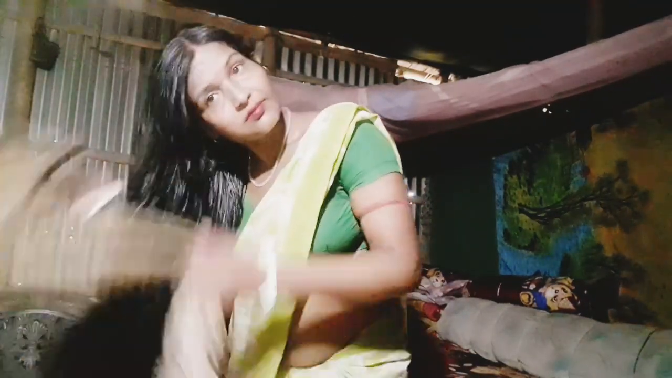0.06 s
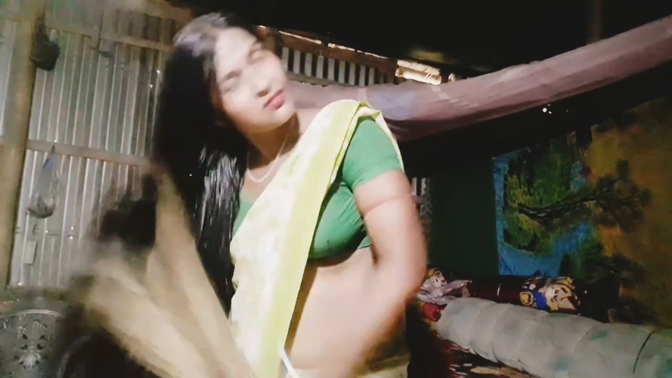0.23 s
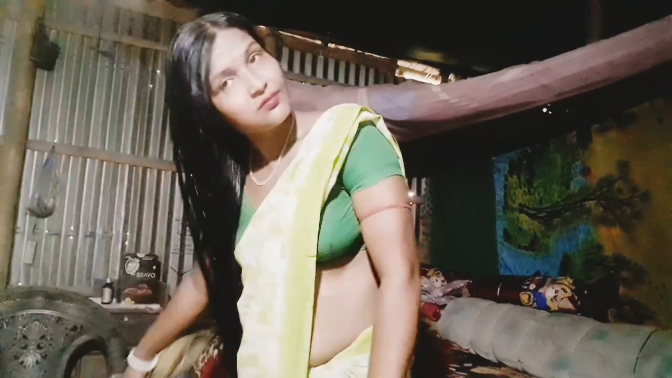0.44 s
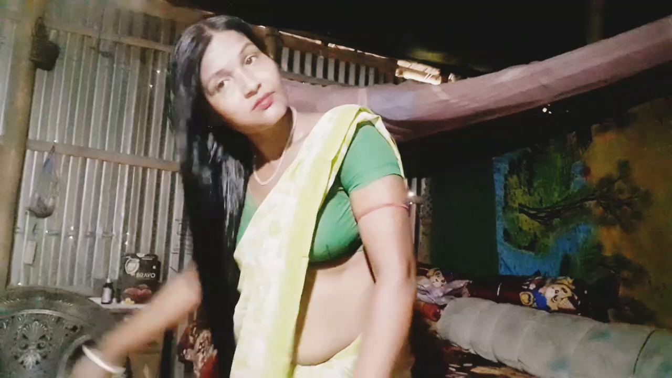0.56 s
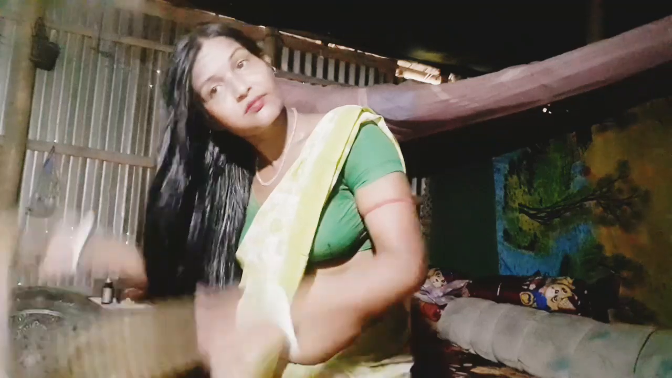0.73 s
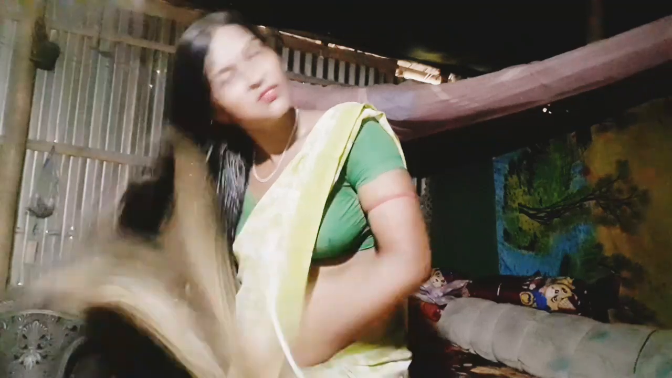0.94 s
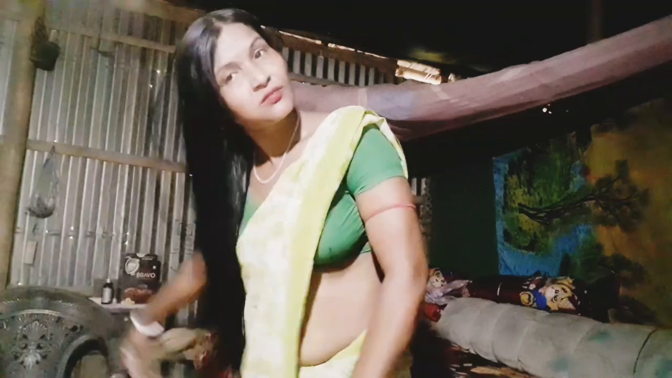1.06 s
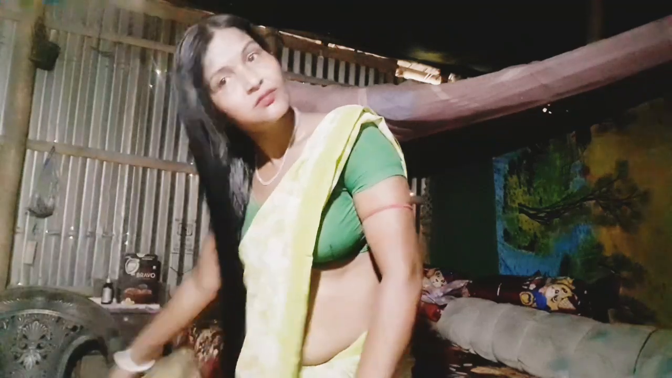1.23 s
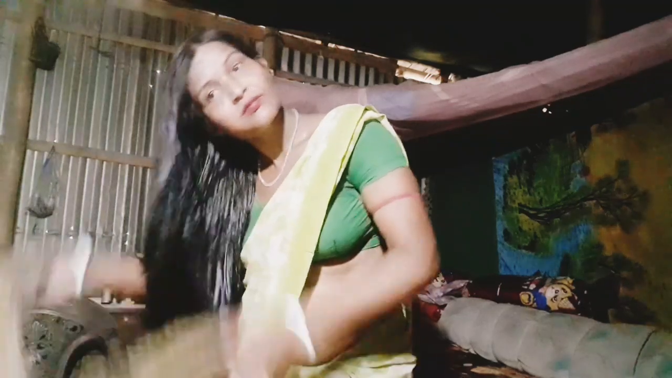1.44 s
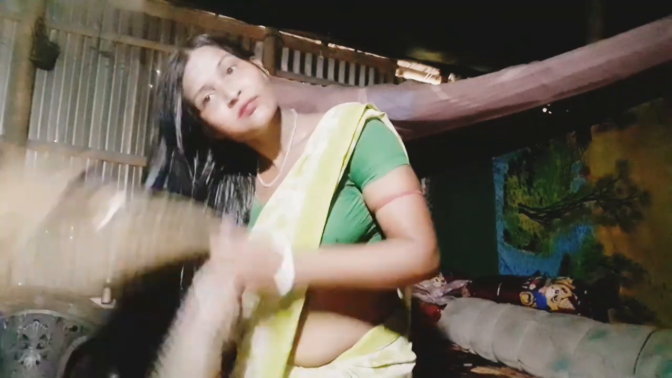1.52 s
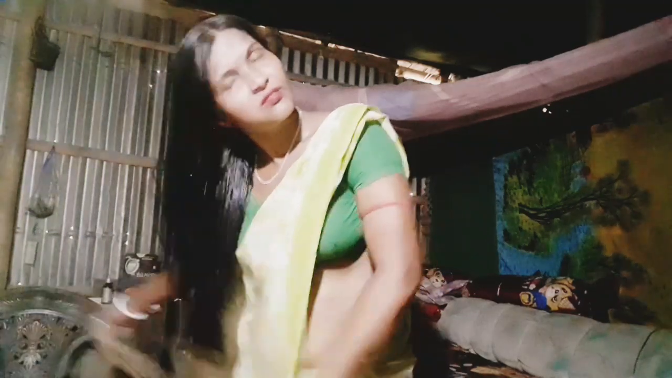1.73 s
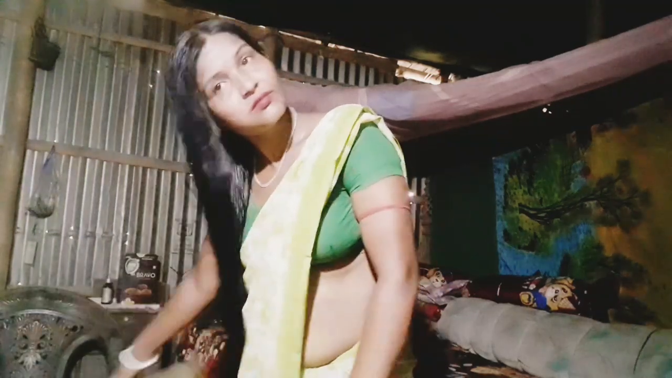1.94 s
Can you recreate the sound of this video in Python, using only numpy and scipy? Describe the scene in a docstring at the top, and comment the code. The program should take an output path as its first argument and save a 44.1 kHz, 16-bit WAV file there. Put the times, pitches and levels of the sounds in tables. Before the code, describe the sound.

Wet hair whipped with a cloth three times, crisp hissing swishes in a small humming room

```python
"""Wet hair swishes three times as a cloth is slapped through it in a small room: filtered noise, part hiss, part
spatters, in three bands. Short noise bursts make cracks; clicks, puffs, thumps and damped rings the dull landing.
A faint rustle and bump lift the cloth. Random taps make the room. Underneath: shaped noise for the room,
noise resonances and a narrow band traced point by point near 200 Hz for a fan-like hum, and an insect outside,
a pulsed resonance above 10 kHz."""
import sys
import numpy as np
from scipy import signal
from scipy.io import wavfile
from scipy.ndimage import uniform_filter1d

SR = 44100
rng = np.random.default_rng(int(sys.argv[2]) if len(sys.argv) > 2 else 0)


def dump_mix(stems):
    """Bounce the given channels to the path in sys.argv[1] as a 16-bit WAV at rate SR."""
    frames = np.atleast_2d(stems).T  # one column per channel
    limited = np.clip(frames, -1, 1)  # hard clip at full scale
    pcm = np.round(limited * 32767).astype(np.int16)
    wavfile.write(sys.argv[1], SR, pcm)


def how_loud(loudness_db):
    """Turn decibels into a plain amplitude multiplier (0 dB gives 1, 20 dB gives 10)."""
    steps = np.asarray(loudness_db, float) / 20
    return 10 ** steps


N = 88200

# spectrum of wet strands, swishing or snapping: f/Hz, relative level/dB
STRAND_SPECTRUM = [(60, -41), (100, -5), (350, -5), (800, -4), (1300, -5.5), (1900, -12.5), (2800, -8),
                   (4000, -4), (6500, -3), (7300, -7.5), (8000, -16), (9000, -17), (10200, -7.5),
                   (12300, -2), (15800, 0.5)]
BODY_HZ, TREBLE_HZ = 1900, 9000  # band limits of the strands


def evened(x):
    """Scales to an rms of 1."""
    return x / np.sqrt(np.mean(x ** 2) + 1e-20)


def read(points, hz):
    """Interpolates a table of (f/Hz, value) along log frequency."""
    f, value = np.transpose(points)
    return np.interp(np.log(hz + 1), np.log(f + 1), value)


def add(mix, start_s, sound):
    """Adds a sound in place, cut off at the ends of the mix."""
    at = round(start_s * SR)
    sound = sound[max(-at, 0):]
    part = mix[max(at, 0):][:len(sound)]
    part += sound[:len(part)]


def colour(x, points):
    """Minimum-phase filter of unit energy with the given spectrum shape."""
    gain_db = np.maximum(read(points, np.abs(np.fft.fftfreq(4096, 1 / SR))), -70)
    log_gain = np.log(how_loud(gain_db))
    phase = -signal.hilbert(log_gain).imag
    taps = np.fft.ifft(np.exp(log_gain + 1j * phase)).real[:2048]
    return signal.oaconvolve(x, taps / np.linalg.norm(taps))[:len(x)]


def band(x, lo_hz, hi_hz):
    """Butterworth band-pass."""
    return signal.sosfilt(signal.butter(3, [lo_hz, hi_hz], "band", fs=SR, output="sos"), x)


def resonate(x, hz, width_hz):
    """One-pole resonance of gain 1 that follows the curve hz: shift to 0 Hz, smooth, shift back."""
    turn = np.exp(2j * np.pi * np.cumsum(hz * np.ones(len(x))) / SR)
    r = np.exp(-np.pi * width_hz / SR)
    return 2 * (turn * signal.lfilter([1 - r], [1, -r], x / turn + 1e-18)).real


def air():
    """Room noise: random spectra with slowly drifting patches and a drifting treble."""
    # room noise spectrum: f/Hz, relative level/dB
    air_spectrum = [(15, -58), (30, -34), (60, -19.5), (91, -9.5), (141, -11.5), (211, -3), (269, -10.5),
                    (486, -12.5), (1390, -16.5), (2000, -29), (2970, -39), (5820, -34.5), (7000, -38),
                    (7700, -51), (8900, -53.5), (9700, -39), (10300, -44), (11400, -38.5), (12100, -48),
                    (15800, -40)]
    # treble drift, full from 3 kHz up: t/s, relative level/dB
    treble_drift = [(0, 0.5), (.1, 1), (.5, 2), (.75, -0.5), (1.15, 1), (1.3, 3.5), (1.55, 5), (1.85, 5.5),
                    (2, 2.5)]
    level_db = -52.5
    frames, hz = N // 512 + 5, np.fft.rfftfreq(2048, 1 / SR)
    a, b, patches = rng.standard_normal((frames, 1025, 3)).T
    patches = uniform_filter1d(patches, size=16, axis=0)
    patches = evened(uniform_filter1d(patches, size=8, axis=1))
    drift_db = np.interp(np.arange(frames) * 512 / SR, *np.transpose(treble_drift))
    drift_db = np.outer(np.clip(hz / 1500 - 1, 0, 1), drift_db)
    z = (a + 1j * b) * how_loud(read(air_spectrum, hz)[:, None] + 1.5 * patches + drift_db)
    noise = signal.istft(z, nperseg=2048, noverlap=1536)[1][:N]
    return how_loud(level_db) * evened(noise)


def hum():
    """Fan-like hum: noise through low resonances, and a narrow 200 Hz noise band traced by a jittered sine."""
    # fuzzy motor bands: f/Hz, resonator width/Hz, rms level/dB
    motor_bands = [(97.7, 9.1, -67.5), (186.3, 67, -63.5), (338, 60, -61.5)]
    # chance level and pitch of the narrow noise band, point by point: t/s, f/Hz, rms level/dB
    hum_trace = [(0.0, 203.7, -48), (0.07, 206.6, -66), (0.32, 197.1, -52), (0.39, 227, -73),
                 (0.46, 194.8, -65), (0.55, 193.6, -64), (0.57, 211.8, -59), (0.73, 213.3, -58),
                 (0.8, 173.5, -63), (0.9, 188.8, -51), (1.0, 226.3, -54), (1.06, 204.5, -67),
                 (1.1, 214, -77), (1.21, 197.6, -47.5), (1.31, 208.3, -71), (1.5, 180.7, -48.5),
                 (1.55, 205, -56), (1.77, 184.5, -52.5), (1.88, 200.2, -53.5), (1.93, 176.7, -79),
                 (1.98, 201.3, -80), (2.0, 187, -56)]
    s, hz, db = np.transpose(hum_trace)
    t = np.arange(N) / SR
    jitter_hz = 5 * evened(uniform_filter1d(rng.standard_normal(N), size=500))
    pitch_hz = np.interp(t, s, hz) + jitter_hz
    out = how_loud(np.interp(t, s, db)) * np.sqrt(2) * np.sin(2 * np.pi * np.cumsum(pitch_hz) / SR)
    for f_hz, width_hz, level_db in motor_bands:
        fuzz = resonate(rng.standard_normal(N), f_hz, width_hz)
        out += how_loud(level_db) * evened(resonate(fuzz, f_hz, width_hz))
    return out


def wing_resonance(drive, hz, width_hz):
    """Three equal resonances in series, rms 1."""
    for _ in range(3):
        drive = resonate(drive, hz, width_hz)
    return evened(drive)


def insect():
    """A soft noise band starts each chirp; a wing resonance above it joins, pulsed by its drive."""
    # chirps: start/s, length/s, nominal level/dB, upper f/Hz that the glide approaches
    chirps = [(-.15, 0.23, -75, 10750), (0.459, 0.17, -69, 10230), (0.667, 0.152, -64, 10340),
              (0.835, 0.086, -68, 10260), (1.073, 0.237, -65, 10330), (1.337, 0.19, -65.5, 10320),
              (1.882, 0.22, -66, 10400)]
    teeth_per_s, gate_depth, whistle_amp = 105, 0.8, 0.12
    wing_width_hz = 420  # of each resonance in the series
    under_offset_hz, under_db = 290, -3
    glide, glide_share = 0.00596, 0.356  # initial flatness / f, decay / chirp length
    join_at, peak_at = 0.22, 0.71  # shares of the chirp
    swell_db, fade_db = -5, -12.5  # at start and end, against the peak
    out = np.zeros(N)
    noises = rng.standard_normal((len(chirps), 2, SR // 2))
    for (s, length_s, db, hz), noise in zip(chirps, noises):
        t = np.arange(0, length_s, 1 / SR)
        u = t / length_s
        pitch_hz = hz * (1 - glide * np.exp(-u / glide_share))
        tone = whistle_amp * np.sin(2 * np.pi * np.cumsum(pitch_hz) / SR)
        pulses = 1 - gate_depth * np.cos(2 * np.pi * teeth_per_s * t)
        upper = wing_resonance((noise[0, :len(t)] + tone) * pulses, pitch_hz, wing_width_hz)
        under = wing_resonance(noise[1, :len(t)], pitch_hz - under_offset_hz, wing_width_hz * 1.1)
        wing = upper * np.clip((u - join_at) / 0.2 + 0.5, 0, 1) + how_loud(under_db) * under
        edge = np.minimum(np.minimum(t / 0.0097, (length_s - t) / 0.017), 1)
        shape_db = np.interp(u, [0, peak_at, 1], [swell_db, 0, fade_db])
        add(out, s, edge * how_loud(db + shape_db) * wing)
    return out


def room(x):
    """Reverberation: sparse taps of random sign, each band dying at its own speed."""
    # decay by 60 dB: f/Hz, T60/s
    room_t60 = [(300, 0.26), (2000, 0.24), (8000, 0.13), (15000, 0.19)]
    level_db = -9
    taps, slots = np.zeros(SR // 2), np.arange(150, SR // 2 - 20, 20)
    taps[slots + rng.integers(0, 20, len(slots))] = rng.choice([-1., 1.], len(slots))
    hz, t, z = signal.stft(taps, SR, nperseg=256)
    tail = signal.istft(z * how_loud(-60 * t / read(room_t60, hz)[:, None]), SR, nperseg=256)[1]
    return how_loud(level_db) * signal.fftconvolve(x, tail / np.linalg.norm(tail))[:N]


def lifts():
    """The cloth swings up: soft rustle in two noise bands and a small bump of decaying band noise."""
    # lifts: start/s, length/s, rise/s, low rustle/dB, high rustle/dB, nominal bump level/dB
    swings = [(-.06, 0.24, .02, -56, -77, -74), (0.1, 0.077, 0.064, -43.5, -46, -37),
              (0.785, 0.11, 0.01, -64, -62, -40), (1.467, 0.088, 0.014, -49.5, -70, -39)]
    # rustle spectrum: f/Hz, relative level/dB
    rustle_spectrum = [(120, -58), (200, 14), (1610, -16), (2300, -16), (2830, -27.5), (4080, -21.5),
                       (6690, -26), (8330, -48.5), (10400, -34.5), (15800, -45)]
    split_hz, fall_s, fade_db = 2600, 0.067, -3.5
    bump_hz, bump_t60_s, bump_lag_s = 486, 0.038, 0.0019
    low, high, bumps, t = np.zeros(N), np.zeros(N), np.zeros(N), np.arange(3000) / SR
    noises = rng.standard_normal((len(swings), len(t)))
    for (s, length_s, rise_s, low_db, high_db, bump_db), noise in zip(swings, noises):
        u = np.arange(0, length_s, 1 / SR)
        shape = np.minimum(u / rise_s, 1) * np.minimum((length_s - u) / fall_s, 1)
        shape = shape * how_loud(fade_db * u / length_s)
        add(low, s, shape * how_loud(low_db))
        add(high, s, shape * how_loud(high_db))
        burst = noise * np.minimum(t / 0.01, 1) * how_loud(bump_db - 60 * t / bump_t60_s)
        bump = band(burst, bump_hz / 2, bump_hz * 1.73)
        add(bumps, s + bump_lag_s, bump * np.sqrt(SR / (3 * bump_hz)))  # offsets band-pass loss
    rustle = colour(rng.standard_normal(N), rustle_spectrum)
    low_rustle = evened(band(rustle, 536, split_hz))
    high_rustle = evened(band(rustle, split_hz, 18700))
    return low * low_rustle + high * high_rustle + bumps


def knocks():
    """Dull knocks of hand and cloth: each one quickly damped sine."""
    # knocks: t/s, initial envelope level/dB, f/Hz
    rings = [(.1025, -29, 626), (.1466, -28.5, 1030), (.7875, -42, 530), (.8663, -24, 541.4),
             (1.4735, -34, 447), (1.498, -50, 1090), (.553, -36, 750), (1.4875, -34.5, 818),
             (1.5868, -28, 600), (1.5871, -28, 1280), (1.5945, -39, 940)]
    t60_s = 0.0047
    out, t = np.zeros(N), np.arange(1500) / SR
    for s, db, hz in rings:
        add(out, s, how_loud(db - 60 * t / t60_s) * np.sin(2 * np.pi * hz * t))
    return out


def smacks():
    """The cloth lands: a click, a noise puff that swells briefly and dies, a thump of low band noise."""
    # landings: t/s, click drive level/dB, puff and thump against it/dB
    landings = [(0.1459, -36.5, -2, -4.5), (0.8668, -34.5, -4.5, -2), (1.5871, -24.5, -12, -10)]
    # click and puff spectrum: f/Hz, relative level/dB
    smack_spectrum = [(35, -62), (60, 1.5), (618, 1.5), (1330, -12.5), (1750, -23.5), (2750, -8.5),
                      (4180, -3), (6990, -8.5), (8220, -27.5), (11100, -20.5), (15800, -20.5)]
    puff_t60_s, puff_lead_s, thump_t60_s = 0.1, 0.002, 0.051
    sharp, low, t = np.zeros(N), np.zeros(N), np.arange(8000) / SR
    noises = rng.standard_normal((len(landings), len(t)))
    for (s, db, puff_db, thump_db), noise in zip(landings, noises):
        add(sharp, s, how_loud(db) * 3 * (t == 0))
        swell = np.minimum(t / puff_lead_s, 1) ** 2
        add(sharp, s - puff_lead_s, noise * swell * how_loud(db + puff_db - 60 * t / puff_t60_s))
        thump = evened(band(noise[::-1], 146, 1440)) * np.minimum(t / 0.0007, 1)
        add(low, s, thump * how_loud(db + thump_db - 60 * t / thump_t60_s))
    return colour(sharp, smack_spectrum) + low


def cracks():
    """Wet strands snap taut: an impulse and a very short noise burst each."""
    # snaps: t/s, drive level/dB, treble against it/dB
    snaps = [(.2411, -10.5, -3.5), (0.2464, -7, 0), (0.2476, -18, -8), (0.252, -10, 0), (0.2724, -11.5, -5),
             (0.305, -33, 6), (0.9608, -12.5, 2.5), (.9657, -24, 3), (.9685, -31, 4), (1.6155, -39, 1),
             (1.668, -37, 4), (1.6839, -40, -4), (1.6982, -20.5, 1.5), (1.7122, -34, 0), (1.732, -28, -3)]
    t60_s = 0.0035
    low, high, t = np.zeros(N), np.zeros(N), np.arange(600) / SR
    bursts = rng.standard_normal((len(snaps), len(t)))
    for (s, db, treble_db), burst in zip(snaps, bursts):
        snap = (np.clip(burst, -1.5, 1.5) + 3 * (t == 0)) * how_loud(db - 60 * t / t60_s)
        add(low, s, snap)
        add(high, s, snap * how_loud(treble_db))
    return colour(band(low, 550, TREBLE_HZ) + band(high, TREBLE_HZ, 17930), STRAND_SPECTRUM)


def spatter_hiss():
    """Strand noise: steady power plus decaying power bursts of random drops."""
    drops_per_s, drop_spread_db, drop_decay_s, drop_share = 1500, 5.5, 0.0003, 0.2  # share of power
    size = how_loud(drop_spread_db * np.minimum(rng.exponential(1, N), 3))
    hits = size * (rng.random(N) < drops_per_s / SR)
    drops = signal.lfilter([1], [1, -np.exp(-1 / (drop_decay_s * SR))], hits)
    power = 1 - drop_share + drop_share * evened(drops) ** 2
    return colour(rng.standard_normal(N) * np.sqrt(power), STRAND_SPECTRUM)


def swishes():
    """Hiss and spatters of strands in clumps; main, treble and body bands follow own stroke envelopes."""
    # one table per stroke: t/s, main band level/dB, treble against it/dB, body against it/dB
    strokes = [
        [(.165, -59.5, -2, 10), (.2, -45.5, -12, -12.5), (.227, -38, -11, -8), (.237, -31, -4, -20),
         (.241, -24, -4, -16), (.258, -24.5, 1, -17), (.275, -26.5, -2.5, -12), (.285, -32, -1.5, -10.5),
         (.311, -40.5, 2, 1.5), (.361, -61, -13, -16), (.45, -70, -8, 1)],
        [(.885, -55, -12, 4.5), (.9, -57.5, -10, -10), (.92, -46.5, -7, -35), (.943, -42, -19, -10),
         (.953, -33.5, -4, -7), (.961, -31.5, 5.5, -30), (.975, -30, -1, -14), (1.019, -38.5, 1, -7),
         (1.059, -62.5, -11, -25), (1.13, -73, -1, 5)],
        [(1.605, -55, -11, -14), (1.621, -50, -5, -17), (1.649, -41.5, -10, -4.5), (1.664, -38.5, -6, -17),
         (1.673, -29, 4, -17), (1.678, -35, -2, -6), (1.684, -28.5, 0, -10), (1.694, -41, 1, -12),
         (1.703, -37.5, 1, -5), (1.709, -34.5, -6, -14.5), (1.715, -36, -1, -12), (1.731, -37.5, -1, -6.5),
         (1.759, -50.5, -6, -16), (1.82, -76.5, -15, 24.5)],
    ]
    clump_db, clump_s = 1.3, 0.0015
    hiss = spatter_hiss()
    limits_hz = [(BODY_HZ, TREBLE_HZ), (TREBLE_HZ, 20000), (40, BODY_HZ)]
    parts = [evened(band(hiss, *hz)) for hz in limits_hz]
    clumps = uniform_filter1d(rng.standard_normal((3, N)), size=round(clump_s * SR), axis=1)
    parts = parts * how_loud(clump_db * evened(clumps + clumps[0]))  # partly shared by the bands
    t, out = np.arange(N) / SR, np.zeros(N)
    for stroke in strokes:
        s, db, treble_db, body_db = np.transpose(stroke)
        s = np.r_[s[0] - 0.02, s, s[-1] + 0.03]
        for part, level_db in zip(parts, (db, db + treble_db, db + body_db)):
            level_db = np.r_[-85, level_db, -100]
            out += part * how_loud(np.interp(t, s, level_db, -200, -200))
    return out


def scene():
    """Cloth and hair with their reverberation, over the background."""
    cloth = swishes() + cracks() + smacks() + knocks() + lifts()
    return (cloth + room(cloth) + air() + hum() + insect())[None]


def top_cut(x):
    """Nothing passes above 16.63 kHz."""
    return signal.sosfilt(signal.butter(12, 16630, fs=SR, output="sos"), x)


def record(dry):
    """Linear-phase low-pass at 15.85 kHz ahead of the output."""
    lowpass = signal.firwin(511, 15850, window=("kaiser", 9), fs=SR)
    finished = signal.oaconvolve(dry, lowpass[None], "same")
    return top_cut(finished)


dry = scene()
out = record(dry)
dump_mix(out)
```